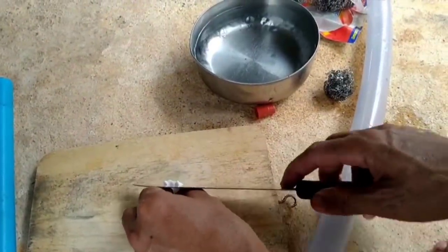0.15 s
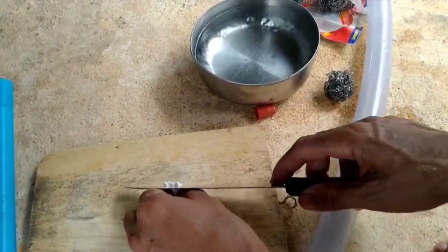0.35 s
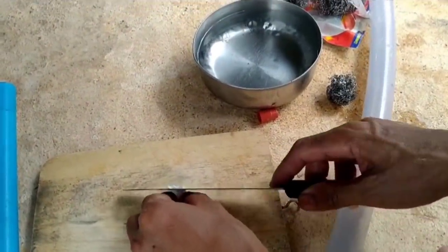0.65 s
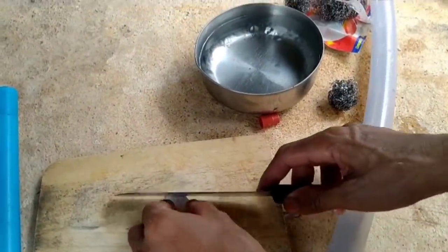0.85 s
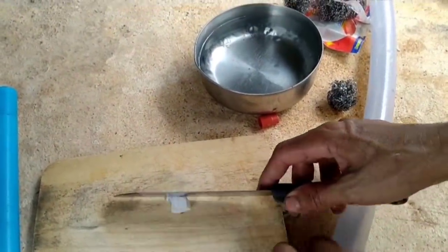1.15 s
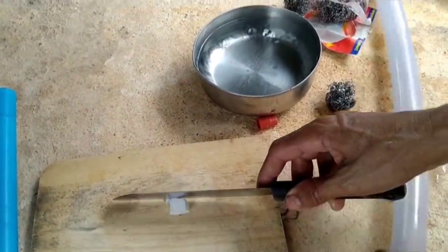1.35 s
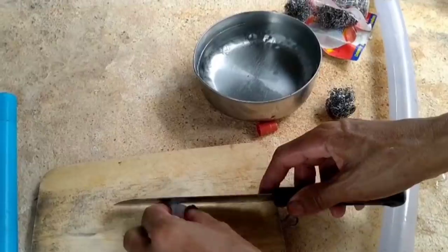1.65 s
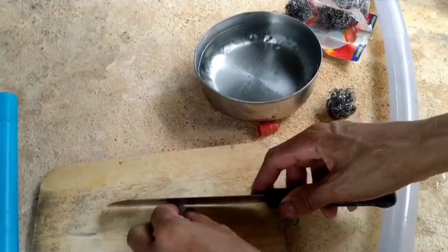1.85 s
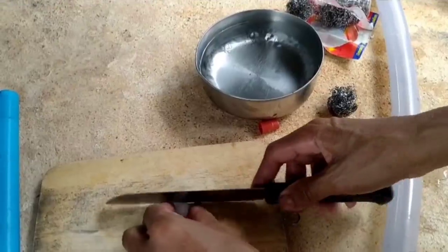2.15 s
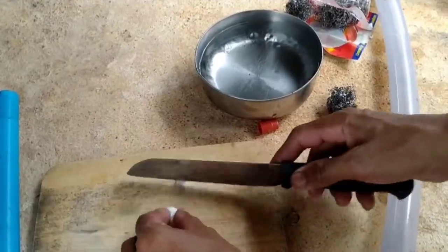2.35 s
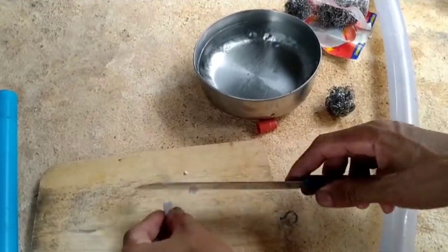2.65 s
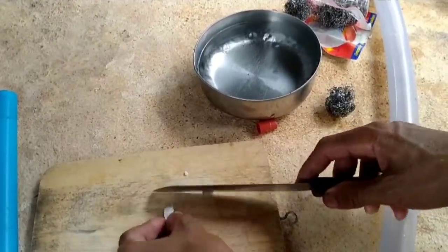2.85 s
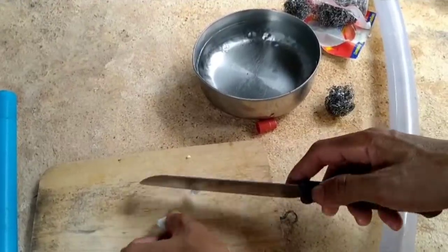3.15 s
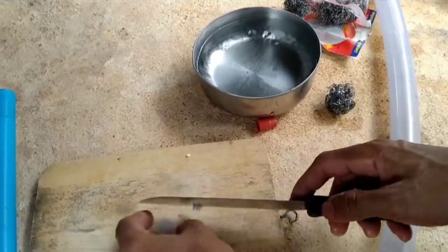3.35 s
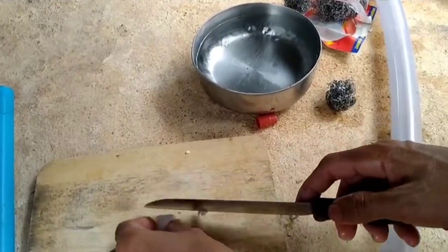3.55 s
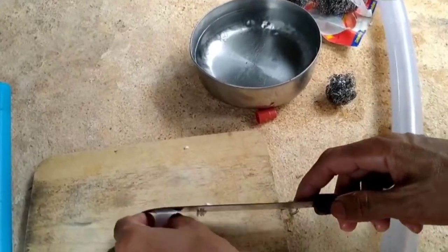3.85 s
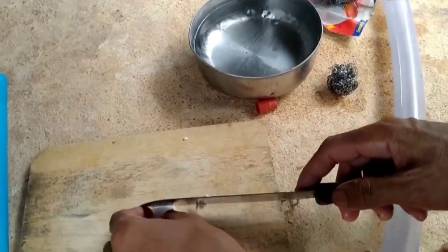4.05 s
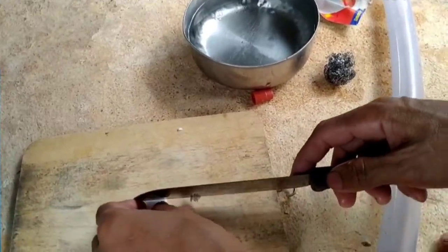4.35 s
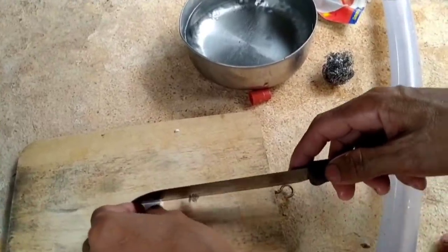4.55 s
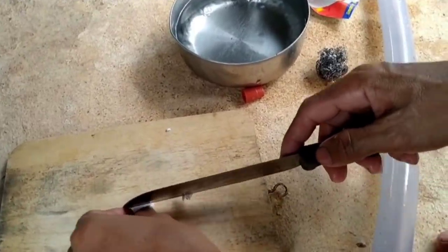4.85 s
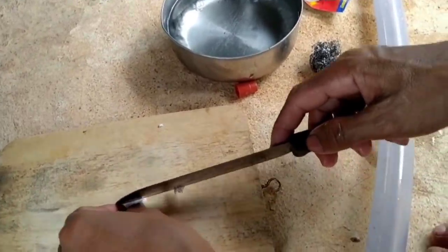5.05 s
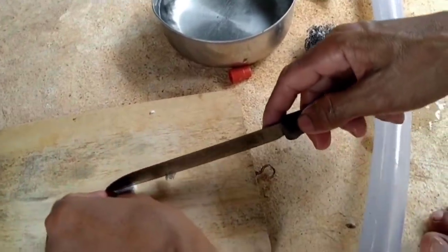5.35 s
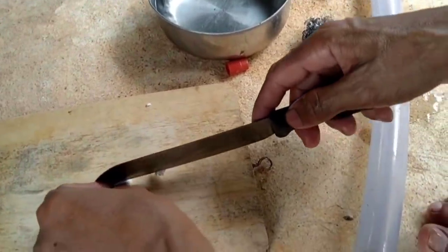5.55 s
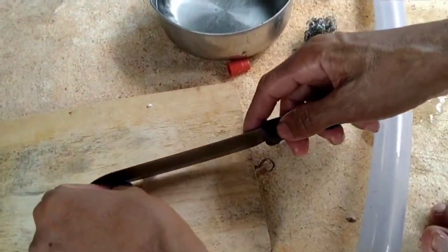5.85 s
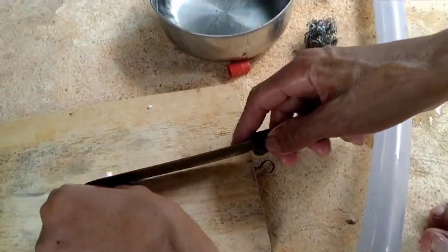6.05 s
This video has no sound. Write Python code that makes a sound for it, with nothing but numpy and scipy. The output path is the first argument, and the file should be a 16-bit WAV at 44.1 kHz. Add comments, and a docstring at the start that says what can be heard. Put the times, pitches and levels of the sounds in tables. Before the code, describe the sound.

A knife saws through a small scrap of foam on a wooden board with bright tearing hisses, one hard knock, then lighter scrapes.

```python
"""Wooden board in a room, close microphone, nearly mono: a kitchen knife saws through a scrap of foam.
Foam cells tear with a bright hiss and small snaps: uneven friction and clicks, filtered and resonated.
Blade and handle drag, knock (once hard, with bounces) and rock on the board: pushes ring decaying modes.
Echoes are dying noise; a low rumble of filtered noise fills the room; a thin sine whistles far off."""
import sys
import numpy as np
from scipy import signal
from scipy.fft import rfft, irfft
from scipy.io import wavfile

SR = 44100
rng = np.random.default_rng(int(sys.argv[2]) if len(sys.argv) > 2 else 0)


def to_wav(s):
    """Save 16-bit WAV."""
    ch = np.atleast_2d(s).T  # columns
    pcm = np.round(np.clip(ch, -1, 1) * 32767)  # PCM
    wavfile.write(sys.argv[1], SR, pcm.astype(np.int16))


def level_to_linear(level):
    """Convert decibel levels to linear amplitude factors, elementwise."""
    exponent = np.asarray(level, float) / 20
    return 10 ** exponent


N = 273420

# strokes of the blade through the foam; at 1.17 and 1.318 s, scraping as the knife rocks:
# start/s, fastest/s, stop/s, hiss drive/dB, rasp drive/dB
STROKES = [(.152, .162, 0.39, -64, -63.5), (.29, .35, 0.48, -61, -64), (.42, .59, .665, -49.5, -51),
           (.665, .725, .79, -50, -49.5), (.79, .88, 0.96, -40.5, -56.5), (.935, .955, 1.04, -52.5, -47.5),
           (1.17, 1.21, 1.315, -58, -53.5), (1.318, 1.33, 1.47, -65.5, -63.5), (1.62, 1.81, 2.13, -68, -63),
           (1.85, 1.905, 2.06, -41, -51.5), (2.03, 2.095, 2.27, -47.5, -49), (2.19, 2.25, 2.47, -48, -52),
           (2.25, 2.362, 2.462, -41, -44), (2.455, 2.47, 2.55, -61, -53.5), (2.52, 2.66, 2.735, -59.5, -62),
           (2.795, 2.822, 2.93, -40.5, -42), (2.9, 2.955, 3.085, -47, -47.5),
           (3.012, 3.055, 3.15, -43, -57), (3.09, 3.13, 3.23, -55.5, -60.5),
           (3.468, 3.515, 3.586, -53.5, -55), (3.56, 3.58, 3.67, -67, -64), (3.629, 3.637, 3.67, -55, -56),
           (3.687, 3.705, 3.72, -60, -60.5), (4.06, 4.178, 4.225, -63, -61), (4.245, 4.265, 4.31, -57, -58),
           (4.36, 4.395, 4.49, -54.5, -54), (4.55, 4.557, 4.61, -59, -56.5), (4.62, 4.661, 4.7, -63.5, -63),
           (4.758, 4.78, 4.96, -65.5, -67.5), (4.812, 4.848, 4.89, -54.5, -53),
           (5.06, 5.075, 5.125, -66.5, -66), (5.13, 5.148, 5.205, -52, -50.5),
           (5.21, 5.238, 5.3, -57.5, -57.5), (5.262, 5.272, 5.4, -66.5, -64.5), (5.33, 5.4, 8.4, -76, -79),
           (5.545, 5.6, 5.78, -48, -56), (5.7, 5.82, 5.9, -47.5, -66), (5.85, 5.92, 6.1, -54, -76.5),
           (5.96, 6.035, 6.118, -33.5, -46.5), (6.135, 6.175, 6.37, -39, -45)]


def rms_one(x):
    """Scales to rms 1."""
    return x / np.sqrt(np.mean(x ** 2) + 1e-20)


def in_time(rows, column, silent):
    """One column of a curve at every sample; outside its span it takes the value silent."""
    rows = np.array(rows)
    return np.interp(np.arange(N) / SR, rows[:, 0], rows[:, column], silent, silent)


def band(x, low_hz, high_hz, order=2):
    """Butterworth band-pass."""
    return signal.sosfilt(signal.butter(order, [low_hz, high_hz], "band", fs=SR, output="sos"), x)


def colour(x, spectrum):
    """Minimum-phase, unit-energy filter from (Hz, dB) points: causal, so clicks stay sharp in front."""
    hz, db = np.transpose(spectrum)
    grid_hz = np.fft.rfftfreq(4096, 1 / SR)
    curve_db = np.interp(np.log(grid_hz + 1), np.log(hz), db)
    cepstrum = irfft(np.log(level_to_linear(curve_db)))
    cepstrum[1:2048] *= 2   # fold onto the causal half
    cepstrum[2049:] = 0
    taps = irfft(np.exp(rfft(cepstrum)))
    return signal.fftconvolve(x, taps / np.sqrt(np.sum(taps ** 2)))[:N]


def drift(rate_hz):
    """Slow random wander, rms 1: noise through a double pole at rate_hz."""
    r = np.exp(-2 * np.pi * rate_hz / SR)
    slow = signal.lfilter([1], [1, -2 * r, r * r], rng.standard_normal(2 * N))
    return rms_one(slow[N:])   # run-in dropped


def ring(push, hz, t60_s):
    """Decaying mode: a unit click sets a sine of height 1 ringing."""
    r, w = level_to_linear(-60 / (t60_s * SR)), 2 * np.pi * hz / SR
    return signal.lfilter([0, np.sin(w)], [1, -2 * r * np.cos(w), r * r], push + 1e-18)


def swells(events, column):
    """Gain of events that speed up to their peak and slow down to a stop, as powers of a quarter sine."""
    edge_db, peaking = -72.5, 0.62   # this share of the height over the edge level comes only at full speed
    t, gain = np.arange(N) / SR, np.zeros(N)
    for row in events:
        start, peak, stop = row[:3]
        part = slice(round(start * SR), round(stop * SR))
        speed = np.sin(np.pi / 2 * np.interp(t[part], [start, peak, stop], [0, 1, 0]))
        power = np.where(t[part] < peak, 0.77, 1)   # speeding up, slowing down
        height_db = peaking * max(row[column] - edge_db, 0)   # loud events peak harder
        gain[part] += level_to_linear(row[column] - height_db * (1 - speed)) * speed ** power
    return gain


def friction(per_s, uneven_db, clump_db, smooth):
    """Dense uneven slips over a smooth share of noise, both swelling in clumps; rms 1."""
    sizes = level_to_linear(uneven_db * np.minimum(rng.exponential(1, N), 5)) * rng.choice([-1, 1], N)
    slips = rms_one(sizes * (rng.random(N) < per_s / SR))
    rough = slips + smooth * rng.standard_normal(N)
    return rms_one(rough * level_to_linear(clump_db * drift(40)))


def foam():
    """Tearing hisses around 8-9 kHz; the blade rasps lower, with a squeak held per grip.

    Also returns, apart from the foam's sound, a faint noise, opposite in the two channels, whose level follows
    the strokes."""
    # tearing: f/Hz, relative density/dB
    hiss_spectrum = [(2940, -48), (5000, -16), (5830, -20.5), (7000, -12), (8290, -2), (8560, -1.5),
                     (9540, -8), (10100, -12), (10600, -11.5), (13200, -21.5), (15300, -17.5)]
    # rasp: f/Hz, relative density/dB
    rasp_spectrum = [(880, -11), (1500, -18.5), (2170, 1), (2960, -10.5), (3190, -2.5), (3650, -4.5),
                     (5610, -12), (6500, -9.5), (8450, -29.5), (14300, -120)]
    # squeak pitch set by the grip on the foam: from t/s, f/Hz, strength/dB
    grips = [(0, 4990, 13), (.5, 2720, 2), (1.7, 4200, 11.5), (1.95, 2200, 7), (2.3, 3700, 0),
             (2.44, 2240, 9), (5.0, 4600, 2), (5.5, 2500, 12), (5.73, 2860, 21.5), (5.99, 2460, 8.5)]
    tear, scrape = swells(STROKES, column=3), swells(STROKES, column=4)
    bright, dull = snaps(tear, puff_ms=4)

    tearing = tear * friction(9000, uneven_db=4, clump_db=1.6, smooth=0.44) + bright
    hiss = colour(tearing, hiss_spectrum)
    hiss = .93 * hiss + .36 * cells(hiss, 5500, 14500)
    # gentle tearing is duller: the top fades below the full level, 0.19 dB per dB
    air_hz, air_full_db = 10700, -48.5
    air = signal.sosfilt(signal.butter(2, air_hz, "high", fs=SR, output="sos"), hiss)
    hiss = hiss - air * (1 - np.clip(tear / level_to_linear(air_full_db), .03, 1) ** 0.19)

    rub = scrape * friction(3500, uneven_db=2, clump_db=2.4, smooth=0.32) + dull
    rasp = level_to_linear(1.5) * colour(rub, rasp_spectrum)
    rasp = .88 * rasp + .45 * cells(rasp, 1900, 5800)

    start_s, squeak_hz, squeak_db = np.transpose(grips)
    grip = np.maximum(np.searchsorted(start_s, np.arange(N) / SR) - 1, 0)
    squeal = level_to_linear(squeak_db[grip]) * squeak(rub, squeak_hz[grip])

    noise = rng.standard_normal(N + 1)
    opposed = level_to_linear(-30) * tear * colour(np.diff(noise), hiss_spectrum)
    opposed += level_to_linear(-25.5) * scrape * colour(np.diff(noise[::-1]), rasp_spectrum)
    return hiss + rasp + squeal, opposed


def snaps(tear, puff_ms):
    """Each cell snap is a sharp click, then a short noise puff; returns the bright and the duller push."""
    # loudest snaps: t/s, relative peak/dB, duller share/dB
    loud_snaps = [(0.161, -46, -4.5), (0.2089, -31, -21.5), (0.333, -38.5, -10.5), (0.363, -35.5, -26.5),
                  (0.8696, -21, -36), (0.9396, -25.5, -37), (1.046, -42.5, -19), (1.321, -39, -7),
                  (1.747, -42, -20), (1.8856, -32, -34), (1.8961, -20, -36), (2.1593, -26, -14),
                  (2.4626, -39.5, -10.5), (2.7977, -29.5, -13), (2.949, -28, -13.5), (3.026, -31, -15),
                  (3.474, -42.5, -11.5), (3.6315, -39, -13), (3.69, -46.5, -10.5), (4.0838, -48.5, -10),
                  (4.181, -32, -20.5), (4.3663, -39, -11.5), (4.553, -37, -13.5), (4.6578, -39.5, -9.5),
                  (4.8379, -29.5, -12), (4.944, -53, -10), (5.136, -31.5, -9), (5.235, -37, -10),
                  (5.266, -32.5, -7), (5.5478, -25, -17.5), (5.566, -24.5, -26), (5.5854, -28, -11),
                  (5.702, -27.5, -43)]
    crackle_per_s = 25   # smaller snaps come at random
    small = (rng.random(N) < crackle_per_s / SR) * level_to_linear(4 * rng.standard_normal(N))
    bright = small * (tear * level_to_linear(0.5) + level_to_linear(-78))   # follows the tearing, over a floor at rest
    dull = bright * level_to_linear(-9.5)
    for s, peak_db, dull_db in loud_snaps:
        bright[round(s * SR)] = level_to_linear(peak_db - 10.5)
        dull[round(s * SR)] = level_to_linear(peak_db + dull_db + 1.5)

    def click_and_puff(push):
        """Click plus exponentially dying noise."""
        envelope = signal.lfilter([1], [1, -np.exp(-1000 / (puff_ms * SR))], push + 1e-18)
        return level_to_linear(3.5) * push + envelope * rng.standard_normal(N)

    return click_and_puff(bright), click_and_puff(dull)


def cells(x, low_hz, high_hz):
    """Foam cells of many sizes resonate, each coming and going as the blade moves on; rms of x."""
    t60_s = 3 * np.log(10) / (np.pi * 300)   # 300 Hz wide
    rings = np.zeros(N)
    for k, hz in enumerate(np.arange(low_hz, high_hz, 620)):
        rings += (-1) ** k * level_to_linear(4 * drift(14)) * ring(x, hz, t60_s)
    return rings * np.sqrt(np.mean(x ** 2) / np.mean(rings ** 2))


def squeak(x, hz, width_hz=420):
    """Resonance whose centre moves, stepped in blocks of 256 samples."""
    out, state, r = np.zeros(N), np.zeros(2), np.exp(-np.pi * width_hz / SR)
    b = [(1 - r * r) / 2, 0, (r * r - 1) / 2]
    for i in range(0, N, 256):
        a = [1, -2 * r * np.cos(2 * np.pi * hz[i] / SR), r * r]
        out[i:i + 256], state = signal.lfilter(b, a, x[i:i + 256], zi=state)
    return out


def board():
    """Knocks and drag ring the same modes; the small board radiates little under its first mode."""
    # blade edge on wood: t/s, relative peak/dB, mode tilt/(dB/octave), contact/ms
    knocks = [(1.956, -38, 3, 0.16), (2.8455, 7.5, 6.5, 0.34), (2.849, -11, -3, 0.84),
              (2.856, -5, 24, 0.61), (2.8688, 6.5, 18.5, 0.75), (2.883, -6.5, -8, 0.42),
              (2.953, -26, -18, 0.23), (2.976, -19.5, 2, 0.12), (3.408, -47, -8, 0.24),
              (5.998, -30.5, -7, 0.23)]
    # board modes: f/Hz, relative level/dB, t60/s
    modes = [(903, -4.5, 0.06), (963, -11, 0.0347), (1047, 1.5, 0.023), (1163, 4, 0.019), (1382, -3, 0.019),
             (1630, 0.5, 0.019), (1843, -4, 0.026), (2070, -15, 0.1), (2200, -4, 0.062), (2450, -31, 0.022),
             (2770, -17.5, .04), (3100, -27, 0.024), (3994, -16, 0.023), (4400, -20.5, 0.011)]
    # edge drags along the wood: start/s, fastest/s, stop/s, drive/dB
    drags = [(.945, .965, 1.01, -54.5), (1.925, 1.975, 2.01, -42), (2.055, 2.098, 2.19, -41),
             (2.21, 2.24, 2.25, -39.5), (2.846, 2.86, 2.925, -34), (2.93, 2.96, 3.0, -52),
             (5.99, 6.04, 6.16, -47.5), (6.14, 6.17, 6.4, -44.5)]
    # the rasp also shakes the board
    pressure = swells(drags, column=3) + level_to_linear(-8) * swells(STROKES, column=4)
    drag = pressure * friction(2000, uneven_db=3, clump_db=2, smooth=.5)
    out = strike(knocks, modes, sliding=False, extra=drag * level_to_linear(-26.5))
    out = signal.sosfilt(signal.cheby2(8, 30, 780, "high", fs=SR, output="sos"), out)
    grit = level_to_linear(-15) * band(drag, 2400, 4600)
    crack = np.zeros(N)
    for s, peak_db, *_ in knocks:   # steel cracks on wood, 1.3 dB per dB of the blow
        crack[round(s * SR) + 30] = level_to_linear(1.3 * peak_db - 32.5)
    return out + grit + band(crack, 60, 5400, order=3)


def knife():
    """The knife, let go, rocks, slides and grates on the wood, ringing its own modes."""
    # rocks on the board: t/s, relative peak/dB, mode tilt/(dB/octave), contact/ms
    rocking = [(1.173, -21.5, -7, 3.2), (1.182, -12, -1, 1), (1.204, -23.5, 13, 20),
               (1.222, -13.5, -4.5, 3.8), (1.234, -13.5, 2, 4), (1.255, -5.5, 2, 4.7),
               (1.327, -33, -19, 3.2), (1.485, -39.5, -19, 4.3)]
    # knife modes: f/Hz, relative level/dB, t60/s
    modes = [(470, -16, 0.031), (678, -24.5, 0.16), (764, -18.5, 0.1), (917, -8.5, 0.096),
             (1132, -11, 0.059), (1584, -11, 0.05), (1820, -5, 0.021), (2094, 3, 0.04), (2500, -13, 0.044),
             (2890, -16, 0.033), (3360, -16.5, 0.035), (3700, -10, 0.014), (4210, -19, 0.033),
             (4260, -14.5, 0.021), (5350, -24.5, 0.018), (7270, -23.5, 0.019)]
    # grating between rocks: start/s, fastest/s, stop/s, drive/dB
    grating = [(1.171, 1.177, 1.2, -46), (1.2, 1.228, 1.25, -42), (1.25, 1.262, 1.308, -35)]
    grit = swells(grating, column=3) * friction(1500, uneven_db=3, clump_db=4, smooth=0.58)
    ringing = strike(rocking, modes, sliding=True, extra=grit * level_to_linear(-23))
    return ringing + level_to_linear(2.5) * band(grit, 900, 6000)


def strike(events, modes, sliding, extra=0):
    """Smooth contact pushes ring modes, tilted by the spot struck; sliding ones push at each mode's pitch."""
    out, t = np.zeros(N), np.arange(600) / SR
    turns = rng.random((len(events), len(modes)))   # random phases
    for k, (hz, mode_db, t60_s) in enumerate(modes):
        push = extra + np.zeros(N)
        octaves = np.log2(np.clip(hz, 690, 2200) / 1400)   # from the tilt pivot
        for (s, peak_db, tilt_db, contact_ms), turn in zip(events, turns[:, k]):
            shape = np.sin(np.pi * np.clip(t * 1000 / max(contact_ms, .05), 0, 1)) ** 2
            shape = shape / shape.sum()
            if sliding:   # the ring swells
                shape = shape * 2 * np.cos(2 * np.pi * (hz * t + turn))
            push[round(s * SR):][:600] += level_to_linear(peak_db - 11.5 + tilt_db * octaves) * shape
        out += level_to_linear(mode_db) * ring(push, hz, t60_s)
    return out


def room(x):
    """Echoes as dying noise, dulled by the walls."""
    t60_s, level_db, wall_cut_hz = 0.15, -18, 1200
    t = np.arange(SR // 2) / SR
    tail = rng.standard_normal(len(t)) * level_to_linear(-60 * t / t60_s) * (t > .004)
    tail = signal.lfilter(*signal.butter(1, wall_cut_hz, fs=SR), tail)
    return level_to_linear(level_db) * signal.fftconvolve(x, tail / np.sqrt(np.sum(tail ** 2)))[:N]


def whistle():
    """A thin far sine near 8 kHz, wavering slightly in pitch and level."""
    # calls: start/s, loudest/s, stop/s, level/dB
    calls = [(3.76, 4.0, 4.045, -79), (4.045, 4.08, 4.12, -70), (4.285, 4.32, 4.36, -74)]
    # pitch: t/s, f/Hz
    pitch = [(3.76, 8350), (4.04, 8100), (4.12, 8080), (4.285, 7620), (4.36, 7760)]
    hz = in_time(pitch, 1, 8000) + 25 * drift(33)
    level = np.sqrt(2) * swells(calls, column=3) * level_to_linear(2 * drift(30))
    return level * np.sin(2 * np.pi * np.cumsum(hz) / SR)


def rumble():
    """Coloured noise whose bass swells slowly, with a few faint narrow noisy bands."""
    # f/Hz, relative density/dB
    spectrum = [(24, -33), (40, -16.5), (76, 1), (202, -1.5), (332, -11), (633, -6.5), (833, -11),
                (920, -12), (2250, -21.5), (4300, -39), (5250, -41), (9300, -46.5), (15300, -61.5)]
    # bass gain: t/s, gain/dB
    bass_swell = [(0, 0.5), (.7, -1), (1.6, -2.5), (2.5, -5), (3.6, -2.5), (4.4, -0.5), (5.1, 2),
                  (5.7, 2.5), (6.2, 1)]
    # steady bands: f/Hz, level/dB, width/Hz
    hums = [(104.6, -56.5, 6.9), (217.4, -59, 32), (1850, -71, 29), (5560, -92.5, 60)]
    out = level_to_linear(-51) * colour(rng.standard_normal(N), spectrum)
    for hz, level_db, width_hz in hums:
        t60_s = 3 * np.log(10) / (np.pi * width_hz)
        out += level_to_linear(level_db) * rms_one(ring(rng.standard_normal(N), hz, t60_s))
    bass = signal.sosfilt(signal.butter(2, 260, fs=SR, output="sos"), out)
    out += bass * (level_to_linear(in_time(bass_swell, 1, 0)) - 1)
    return signal.sosfilt(signal.butter(4, 45, "high", fs=SR, output="sos"), out)


def scene():
    """Nearly mono: both channels share everything but the faint noise that follows the strokes."""
    torn, opposed = foam()
    near = torn + board() + knife()
    return near + room(near) + whistle() + rumble() + opposed * [[1], [-1]]


def band_limit(x):
    """A steep low-pass at the top of the band."""
    return signal.sosfilt(signal.butter(12, 16510, fs=SR, output="sos"), x)


def record(dry):
    """The microphone hisses faintly, the top is cut steeply, peaks clip just under full scale."""
    hiss = level_to_linear(-82.5) * rng.standard_normal(N)
    cut = signal.sosfilt(signal.cheby2(14, 30, 15700, fs=SR, output="sos"), dry + hiss)
    mix = np.clip(cut, -.99, .99)
    return band_limit(mix)


dry = scene()
out = record(dry)
to_wav(out)
```